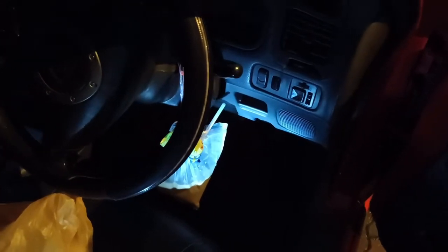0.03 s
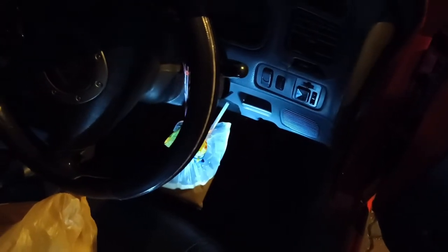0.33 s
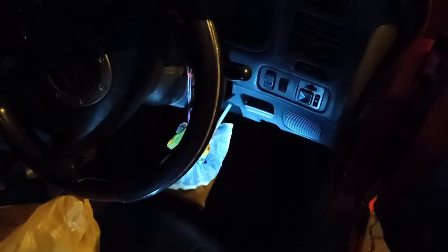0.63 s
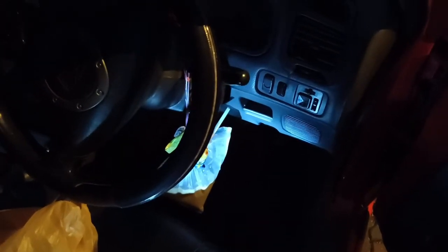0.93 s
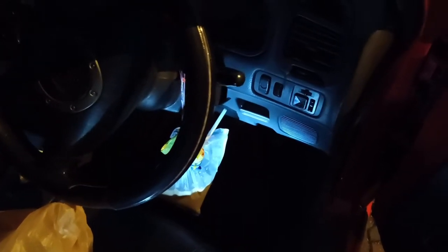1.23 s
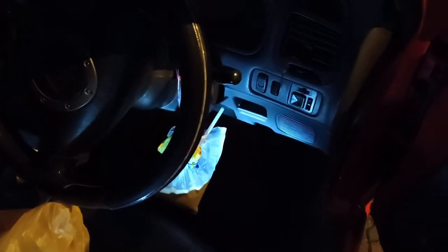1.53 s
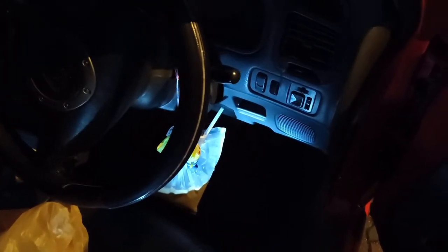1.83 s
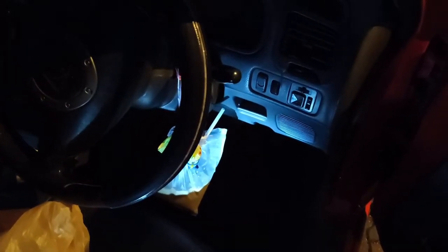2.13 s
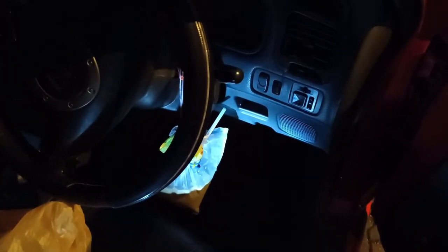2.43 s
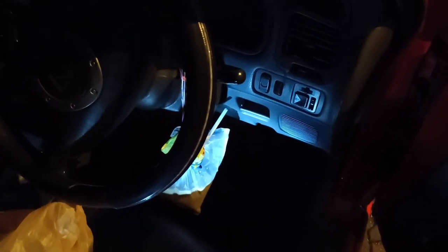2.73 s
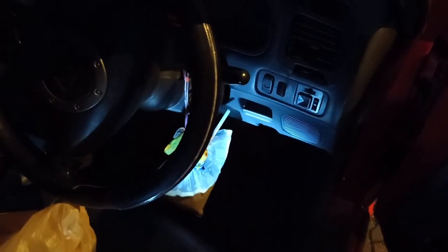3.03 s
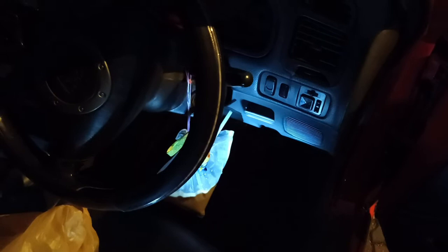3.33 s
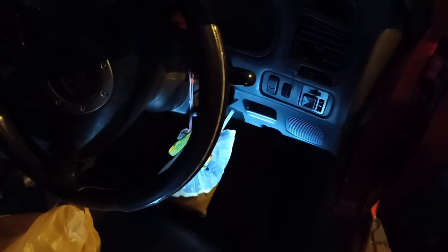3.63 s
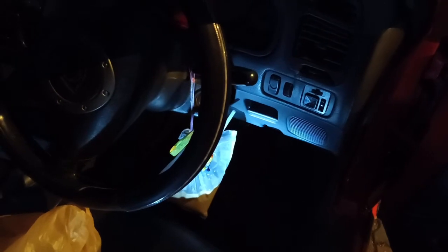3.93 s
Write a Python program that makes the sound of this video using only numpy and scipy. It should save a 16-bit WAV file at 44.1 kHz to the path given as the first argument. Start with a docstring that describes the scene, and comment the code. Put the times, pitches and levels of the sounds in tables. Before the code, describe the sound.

An idling engine booms through a parked car's small cabin, sagging and picking up again. Near the microphone, a plastic dashboard rattle turns into a short buzz and cuts off, then quick, sharp ticks gradually die away.

```python
"""Idling car, loose dashboard

Stereo microphone at the driver's seat of a parked car. The engine idles, sags and picks up again,
each firing booming and knocking through the body. Close by, a loose dashboard part rattles against
its panel, tightens into a buzz and stops as the revs drop. Then something like a relay clicks
seven or eight times a second, fading away in the small cabin."""
import sys
import numpy as np
from scipy import signal
from scipy.fft import rfft, irfft
from scipy.io import wavfile

SR = 44100
rng = np.random.default_rng(int(sys.argv[2]) if len(sys.argv) > 2 else 0)


def master_out(mix):
    """Clip the mix to full scale and print it as 16-bit PCM to the path in sys.argv[1]."""
    frames = np.transpose(np.atleast_2d(mix))
    ceiling = np.clip(frames, -1, 1)
    pcm = np.round(ceiling * 32767).astype(np.int16)
    wavfile.write(sys.argv[1], SR, pcm)


N = 176400

# Levels are relative; a balance is left minus right.
# engine firing rate (t/s, f/Hz)
FIRING_RATE = [(0.0, 31.56), (0.1, 31.38), (0.19, 29.46), (0.3, 32.19), (0.6, 32.57), (0.88, 32.62),
               (1.08, 30.09), (1.32, 25.21), (1.6, 26.68), (2.0, 28.47), (2.5, 30.82), (3.05, 33.16),
               (3.5, 31.2), (4.0, 31.29)]
# centre of the boom, highest under load (t/s, f/Hz)
BOOM_CENTRE = [(0, 76), (.3, 147.5), (.6, 152), (.95, 152), (1.3, 94), (1.8, 91.8), (2.5, 105), (3.05, 118),
               (3.5, 103), (4, 109.6)]
# deep boom of one firing (multiple of the centre, level/dB)
BOOM_SPECTRUM = [(.2, -68), (.45, -24), (.7, -1.5), (.95, 1), (1.2, 0), (1.6, -5), (2, -19.5), (3, -51.5),
                 (6, -62)]
# higher knock, drone of the loose panel, engine rumble, air hiss (f/Hz, level/dB)
KNOCK_SPECTRUM = [(100, -43.5), (195, -15.5), (232, -4), (260, 2), (295, 1), (325, -2), (375, -15.5),
                  (460, -19), (560, -39.5), (2000, -76)]
DRONE_SPECTRUM = [(500, -46.5), (580, -6), (610, -1.5), (645, -1), (670, -12), (755, -2), (830, -30),
                  (1000, -37)]
RUMBLE_SPECTRUM = [(20, -28), (45, -13), (65, -2), (120, 0), (200, -10), (300, -10), (450, -17), (700, -24),
                   (1200, -39), (3000, -67)]
HISS_SPECTRUM = [(200, 10), (500, 1), (800, 3), (1100, -3), (2000, -10.5), (2900, -11.5), (4000, -19),
                 (7000, -21), (11000, -18), (15000, -32)]
# strength of the engine's layers at the seat (t/s, level/dB)
BOOM_LEVEL = [(0, -38), (.08, -33), (.3, -36), (.6, -31.5), (.95, -29.5), (1.3, -32.5), (2, -33.5),
              (2.6, -35), (3.05, -35), (3.17, -41), (3.35, -39), (3.75, -39.5), (4, -45)]
KNOCK_LEVEL = [(0, -32.5), (.2, -29.5), (.3, -26.5), (.6, -27.5), (.95, -28), (1.2, -35), (1.55, -35),
               (1.78, -35.5), (1.95, -39), (2.25, -35), (2.8, -40.5), (3.1, -41), (3.4, -51), (3.9, -52),
               (4, -42.5)]
DRONE_LEVEL = [(.1, -48), (.5, -44), (.98, -48.5), (1.15, -69)]
HISS_LEVEL = [(0.1, -48.5), (2.25, -54), (3.1, -54), (3.36, -56.5)]
# likeness of the noise in the two channels (f/Hz, correlation)
LIKENESS = [(30, 0.91), (250, 1), (500, 0.049), (1000, 0), (3000, 0.028), (12000, 0.25)]
# reverberation of the cabin (f/Hz, t60/s)
CABIN_DECAY = [(80, 0.22), (300, 0.6), (1000, 0.15), (4000, 0.23), (9000, 0.19), (15000, 0.11)]

# relay clicks (t/s, level/dB, balance/dB, tilt/dB per octave)
CLICKS = [(1.322, -21.5, -9.5, 2.5), (1.4528, -16.5, -3, -1.5), (1.5795, -19.5, -2.5, 3),
          (1.694, -23.5, -4.5, 5), (1.811, -19, 0, 2), (1.9579, -16, 1, -0.5), (2.106, -21, -1.5, -0.5),
          (2.2384, -35, -3, 1), (2.356, -28.5, -4, -3), (2.5062, -23, -3.5, 4), (2.643, -23, -3.5, 0.5),
          (2.794, -23, -3.5, -2), (2.9311, -19.5, -2, 4.5), (3.0544, -23, -4, 4), (3.1813, -32, -8, -3.5),
          (3.2919, -32.5, -5, -2), (3.4217, -33, -2, 1), (3.536, -33.5, -6, 7), (3.902, -40.5, 4, -18)]
# click of the relay, hollow tock of its housing (f/Hz, level/dB)
CLICK_SPECTRUM = [(300, -16), (1200, -29), (2500, -27.5), (4000, -22), (5500, -7), (6800, -11.5),
                  (8000, -1.5), (9900, 6.5), (12000, 0.5), (14500, -9.5), (16000, -6)]
TOCK_SPECTRUM = [(300, -15), (560, 0.5), (750, 0.5), (1050, -15), (1900, -15), (3000, -20), (4000, -20)]

# modes of the dashboard panel (f/Hz, level/dB, t60/s)
PANEL_MODES = [(255.7, 0, 0.13), (300.7, 3, 0.14), (590, -18.5, 0.1), (637, -8, 0.095), (717, -16.5, 0.18),
               (740.3, -11.5, 0.18), (767, -16, 0.11), (2780, -30, 0.14)]
# hits of the loose part (t/s, level/dB, panel ring/dB re hit, clack/dB re hit)
RATTLE_HITS = [(0.0034, -35, 8, -12), (0.0657, -27.5, 5, -14.5), (0.1101, -31, 3.5, -17),
               (0.1565, -24.5, 6, -12), (0.2021, -31, 9, -28), (0.218, -31, 5.5, -19),
               (0.2648, -26.5, 7.5, -16), (0.295, -29, 6, -16), (0.31, -33.5, -11, -22),
               (0.356, -25, 0.5, -17.5), (0.4185, -27, -3, -19), (0.4496, -30, -7, -23),
               (0.4651, -28, -6, -32), (0.5116, -23.5, -2, -32), (0.5425, -22.5, 2, -30),
               (0.558, -33, -6, -28), (0.5897, -24.5, 0.5, -33), (0.606, -33, -14, -35),
               (0.6362, -25.5, -1, -34), (0.6513, -25.5, 0, -35), (0.6992, -22.5, -7.5, -34),
               (0.7299, -26.5, -3, -25), (0.7444, -30, -17, -28), (0.7764, -22.5, -2.5, -40),
               (0.7927, -27, -8, -36), (0.8234, -20.5, -8.5, -31)]
# hits shorten and dull as the part tightens (t/s, decay/s, tilt/dB per octave)
TIGHTENING = [(.1, 0.0059, 7.5), (.5, 0.0039, -1.5), (.82, 0.0023, -1)]
# fine chatter between hits; stragglers as the buzz dies (t/s, level/dB)
CHATTER_LEVEL = [(0, -56.5), (1.05, -59), (1.12, -67), (2, -80)]
LAST_HITS = [(1.1402, -21.5), (1.2235, -38)]
# bright scrape, hollow plastic clack, tight buzz (f/Hz, level/dB)
RATTLE_SPECTRUM = [(600, -58), (1200, 3), (1900, -7), (2800, -15), (4200, -5.5), (5600, 7.5), (6500, 1.5),
                   (7600, 9), (8700, 8), (10000, 3), (12200, 4.5), (16000, -9)]
CLACK_SPECTRUM = [(900, -28), (1300, -17), (1700, -1), (2100, -2), (2800, 2), (3300, -20.5), (4200, -29)]
BUZZ_SPECTRUM = [(800, -22), (1500, -11), (2200, -18), (2900, -14), (4300, -19), (5900, -6.5), (6900, -7),
                 (7500, 3), (8400, 2.5), (10200, -4), (12000, -2.5), (13000, -8), (16000, -16)]
# stereo image at the microphone (f/Hz, balance/dB)
CLICK_BALANCE = [(1000, -43), (5000, 6), (8000, -1.5), (12000, 9)]
RATTLE_BALANCE = [(1000, -5), (4000, -2), (7500, -7), (12000, 0.5)]
BUZZ_BALANCE = [(1000, -30), (4000, 6.5), (7800, -19), (12000, 0)]
# share of a balance that goes to the left and to the right channel
SIDES = np.array([[.5], [-.5]])


def amp(db):
    """Decibels to gain."""
    return 10 ** (np.asarray(db) / 20)


def unit(x):
    """Scales to rms 1."""
    return x / np.sqrt(np.mean(x ** 2) + 1e-20)


def read(points, hz):
    """Reads a table on a log-frequency axis."""
    f, value = np.transpose(points)
    return np.interp(np.log(hz + 1), np.log(f + 1), value)


def curve(points):
    """Reads a control curve at every sample."""
    return np.interp(np.arange(N) / SR, *np.transpose(points))


def add(mix, s, sound):
    """Mixes a sound in at time s."""
    part = mix[..., max(round(s * SR), 0):][..., :sound.shape[-1]]
    part += sound[..., :part.shape[-1]]


def ring(points, tilt_db=0, balance=None, size=4096):
    """Minimum-phase impulse response with this spectrum; stereo if a balance is given."""
    hz = abs(np.fft.fftfreq(size, 1 / SR))
    db = read(points, hz) + tilt_db * np.log2(np.clip(hz, SR / 24, SR / 3) / SR)
    if balance is not None:
        db = db + SIDES * read(balance, hz)
    spectrum = np.exp(np.conj(signal.hilbert(np.log(amp(db)))))
    response = np.fft.ifft(spectrum).real[..., :size // 2]
    return np.atleast_2d(unit(response) / np.sqrt(size / 2))


def through(x, response):
    """Convolves each channel."""
    return signal.fftconvolve(np.atleast_2d(x), response, axes=1)[:, :N]


def noise(points):
    """Stereo noise with this spectrum, alike on both sides in the bass."""
    hz = np.fft.rfftfreq(N, 1 / SR)
    left, other = rfft(rng.standard_normal((2, N)))
    same = read(LIKENESS, hz)
    right = same * left + np.sqrt(1 - same ** 2) * other
    return unit(irfft(np.array([left, right]) * amp(read(points, hz)), N))


def scrape(decay_s, size=2048):
    """A brief contact: a burst of tiny impacts, different in each channel."""
    t = np.arange(size) / SR
    attack = np.minimum(t / .0016, 1) ** 3
    decay = np.exp(-np.maximum(t - .0012, 0) / decay_s)
    return rng.standard_normal((2, size)) * attack * decay


def cabin(x, wet_db, size=16384):
    """Adds the short, dense tail of the cabin around the microphone."""
    hz, t, spectra = signal.stft(rng.standard_normal((2, size)), SR, nperseg=256)
    decay = amp(-60 * t / read(CABIN_DECAY, hz)[:, None])
    tail = signal.istft(spectra * decay, SR, nperseg=256)[1]
    tail *= np.minimum(np.arange(tail.shape[1]) / SR / .0042, 1) ** 2
    return x + amp(wet_db) * through(x, tail / np.linalg.norm(tail[0]))


def engine(jitter_s=.00013, uneven_db=.8, knock_lag_s=.00034, left_lag_s=.00034, balance_db=-.24):
    """From inside: each firing booms, knocks and sets the panel droning, over rumble and hiss."""
    cycles = np.cumsum(curve(FIRING_RATE)) / SR - .04
    firings = np.flatnonzero(np.diff(np.floor(cycles)))
    scatter = rng.standard_normal((200, 3))
    centre_hz = curve(BOOM_CENTRE)
    booms, kicks = np.zeros((2, N))
    for at, (late, boom_swing, kick_swing) in zip(firings, scatter):
        s = at / SR + jitter_s * late
        boom = ring([(ratio * centre_hz[at], db) for ratio, db in BOOM_SPECTRUM])[0]
        add(booms, s, -amp(uneven_db * boom_swing) * boom)
        add(kicks, s + knock_lag_s, -amp([uneven_db * kick_swing]))
    knocks = cabin(through(kicks, ring(KNOCK_SPECTRUM)), wet_db=-9)[0]
    drone = through(kicks, ring(DRONE_SPECTRUM))[0]
    body = unit(booms) * amp(curve(BOOM_LEVEL))
    body += unit(knocks) * amp(curve(KNOCK_LEVEL))
    body += unit(drone) * amp(curve(DRONE_LEVEL))
    t = np.arange(N) / SR
    left = np.interp(t - left_lag_s, t, body)
    low = np.array([left, body]) + amp(-43.5) * noise(RUMBLE_SPECTRUM)
    throb = 1 + .1 * np.cos(2 * np.pi * (cycles - .15))
    hiss = noise(HISS_SPECTRUM) * amp(curve(HISS_LEVEL) + 6.5) * throb
    return low * amp(SIDES * balance_db) + hiss


def relay(lead_in_db=-15.5, snap_db=11, lead_in_s=.0018, decay_s=.0012, size=512):
    """Small clicks: a faint, brief noise leads into each sharp snap, with a soft tock of the housing."""
    clicks = np.zeros((2, N))
    t = np.arange(size) / SR
    envelope = np.where(t < lead_in_s, amp(lead_in_db), np.exp(-abs(t - lead_in_s) / decay_s))
    for s, db, balance_db, tilt_db in CLICKS:
        burst = envelope * rng.standard_normal((2, size))
        add(burst, lead_in_s, amp([snap_db]) * rng.choice([-1, 1], (2, 1)))
        click = through(burst, ring(CLICK_SPECTRUM, tilt_db, CLICK_BALANCE))
        click /= np.linalg.norm(click, axis=1, keepdims=True)
        add(clicks, s, amp(db + 13 + SIDES * balance_db) * click)
        tock = through(scrape(decay_s=.004), ring(TOCK_SPECTRUM))
        add(clicks, s, amp(-28 + .46 * db) * tock)  # varies less than the click
    return cabin(clicks, wet_db=-10)


def panel(detune=.005, size=8192):
    """The struck dashboard panel rings; each mode reaches the two channels with its own phase."""
    t = np.arange(size) / SR
    modes = np.zeros((2, size))
    for hz, db, t60 in PANEL_MODES:
        drift, spread = rng.standard_normal(2)
        phase = SIDES * spread * min(hz / 500, 2)
        modes += amp(db - 60 * t / t60) * np.sin(2 * np.pi * hz * (1 + detune * drift) * t + phase)
    return amp(-2.5) * modes * np.minimum(t / .0022, 1)


def rattle():
    """Close by, the loose part hits unevenly: a bright scrape, and the clack and ring of the panel."""
    chatter = amp(curve(CHATTER_LEVEL)) * rng.standard_normal((2, N))
    scrapes = through(chatter, ring(RATTLE_SPECTRUM, balance=RATTLE_BALANCE))
    rings, clacks = np.zeros((2, 2, N))
    times, decays, tilts = np.transpose(TIGHTENING)
    for s, db, panel_db, clack_db in RATTLE_HITS:
        colour = ring(RATTLE_SPECTRUM, np.interp(s, times, tilts), RATTLE_BALANCE)
        contact = scrape(np.interp(s, times, decays))
        add(scrapes, s, amp(db - 5) * through(contact, colour))
        add(rings, s, amp(db + panel_db) * panel())
        add(clacks, s, amp(db + clack_db) * scrape(decay_s=.0069))
    return cabin(scrapes + through(clacks, ring(CLACK_SPECTRUM)), wet_db=-7) + rings


def buzz(start_s=.8398, end_s=1.066, rate_hz=63.6, scatter_db=1.2, decay_s=.0009):
    """The part strikes one spot about twice a firing, shaking the panel; two late hits follow."""
    hits, rings = np.zeros((2, 2, N))
    same_spot = scrape(decay_s)
    times = np.arange(start_s, end_s, 1 / rate_hz)
    steady = [(s, -23.5 + scatter_db * rng.standard_normal()) for s in times]
    for s, db in steady + list(LAST_HITS):
        contact = np.sqrt(.5) * (same_spot + scrape(decay_s))  # half repeats, half is new
        add(hits, s, amp(db) * contact)
        add(rings, s, amp(db - 20) * panel())
    return cabin(through(hits, ring(BUZZ_SPECTRUM, balance=BUZZ_BALANCE)), wet_db=-9.5) + rings


def scene():
    """Everything that reaches the driver's seat."""
    return engine() + rattle() + buzz() + relay()


def record(dry):
    """The recorder's band limit cuts the highest treble."""
    lowpass = signal.firwin(255, cutoff=15900, window=("kaiser", 9), fs=SR)
    return signal.oaconvolve(dry, lowpass[None], "same", axes=1)


dry = scene()
out = record(dry)
master_out(out)
```